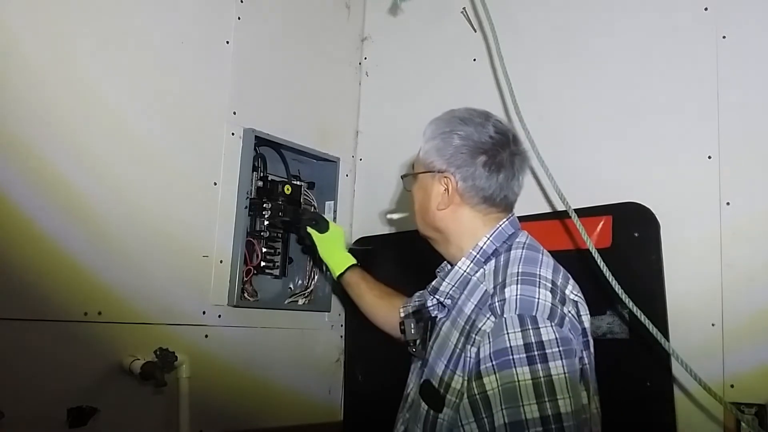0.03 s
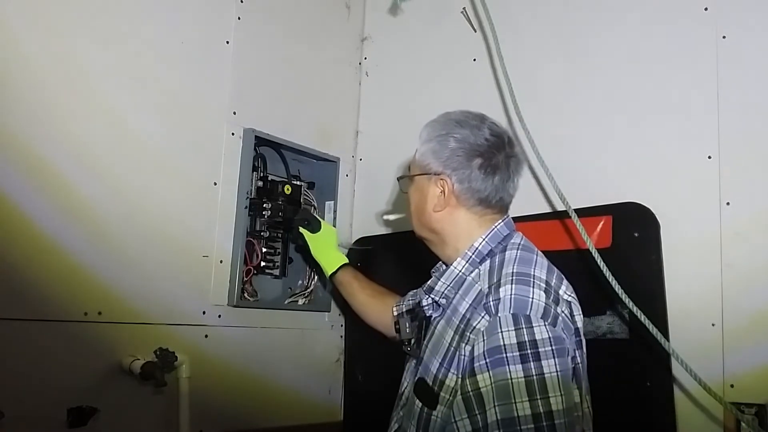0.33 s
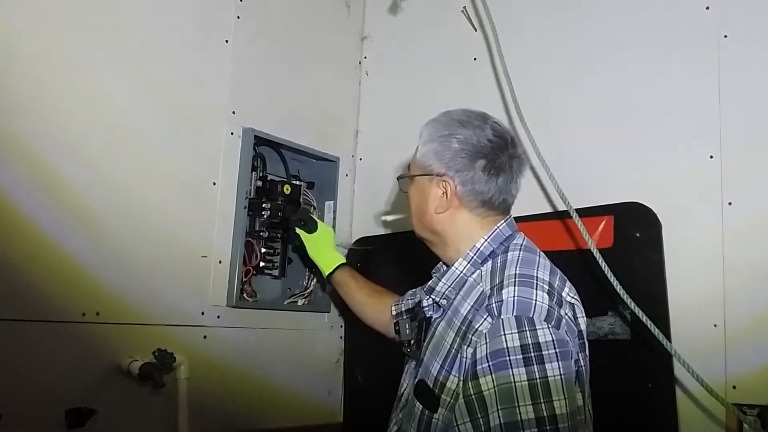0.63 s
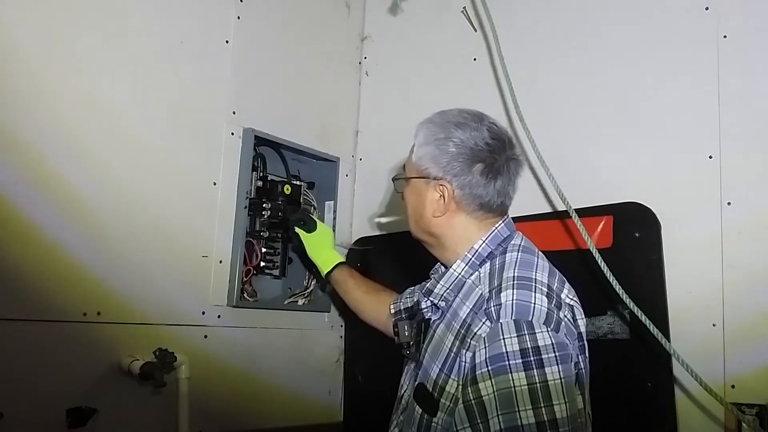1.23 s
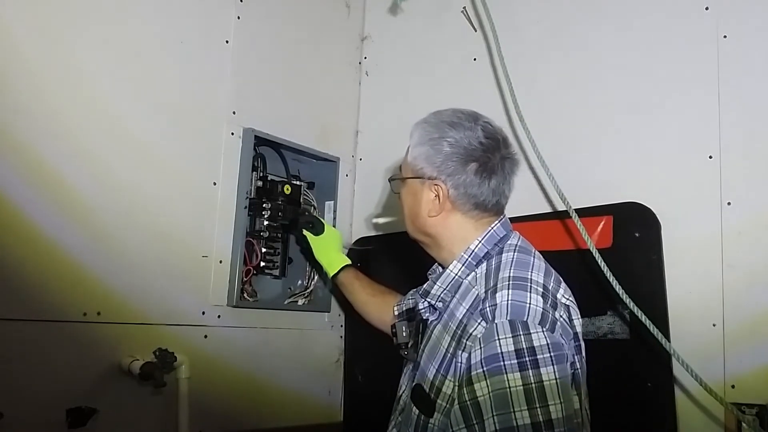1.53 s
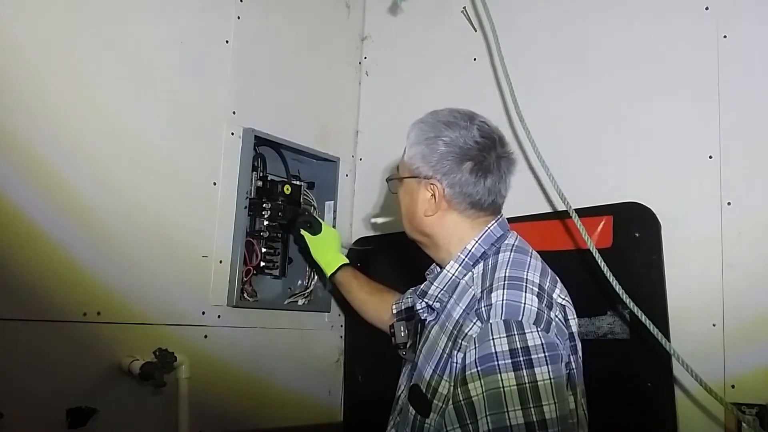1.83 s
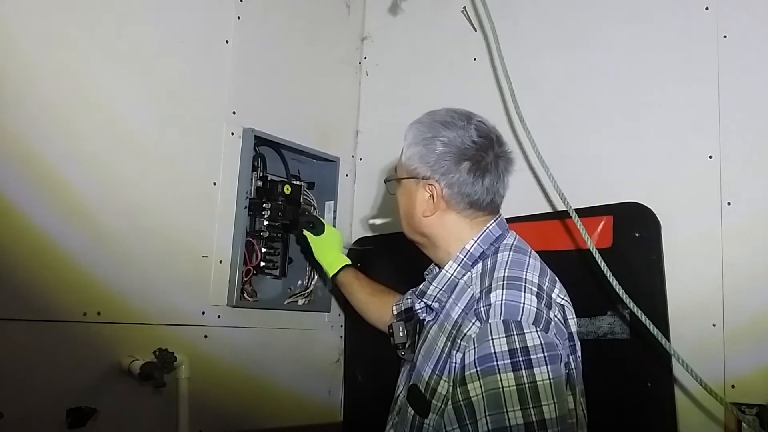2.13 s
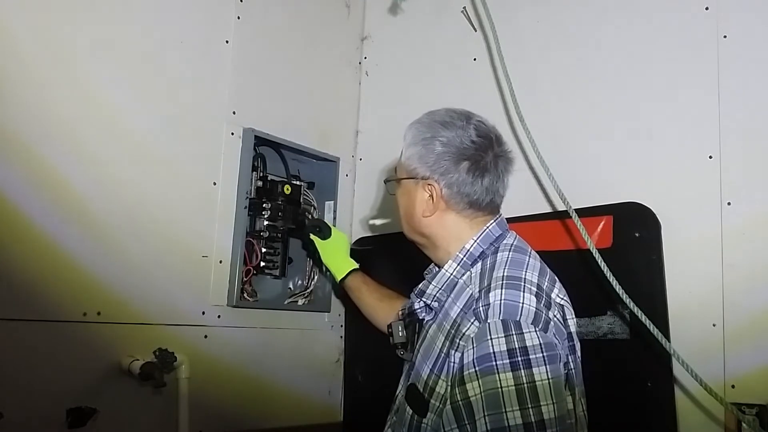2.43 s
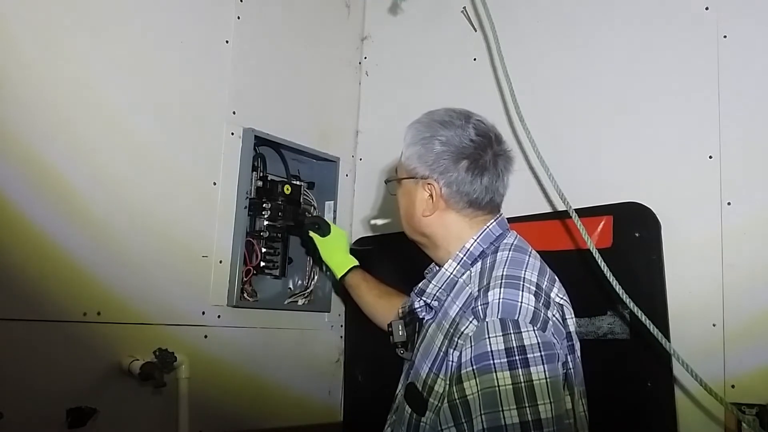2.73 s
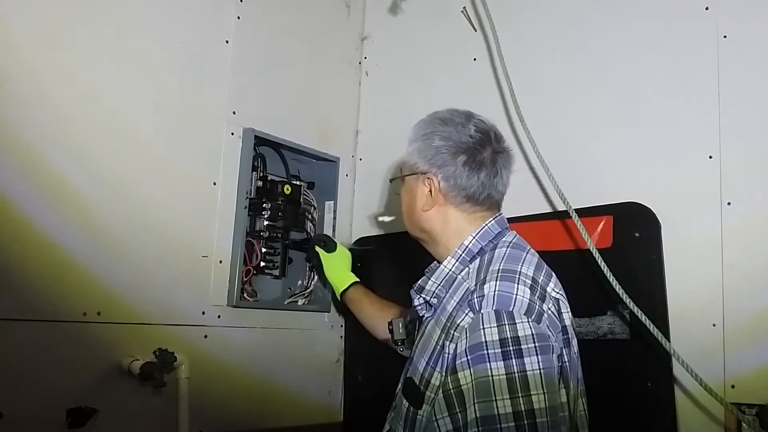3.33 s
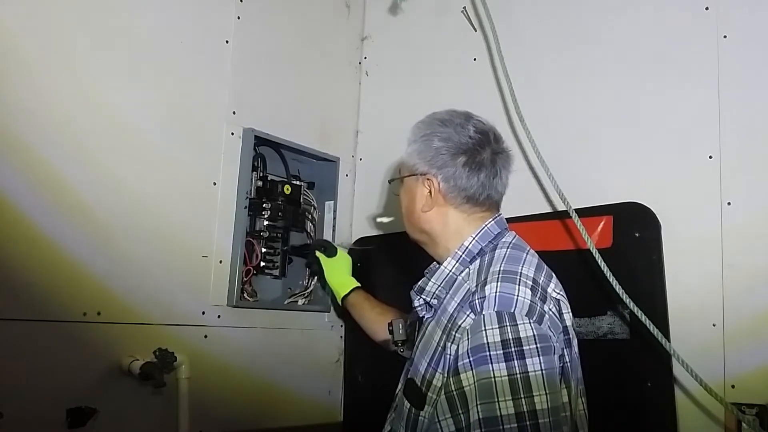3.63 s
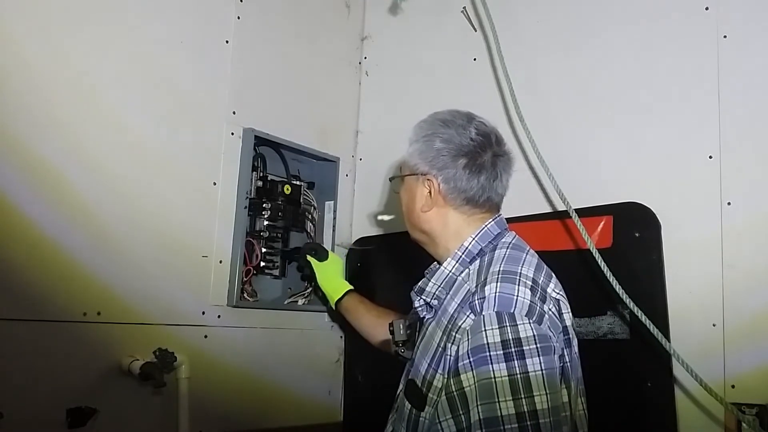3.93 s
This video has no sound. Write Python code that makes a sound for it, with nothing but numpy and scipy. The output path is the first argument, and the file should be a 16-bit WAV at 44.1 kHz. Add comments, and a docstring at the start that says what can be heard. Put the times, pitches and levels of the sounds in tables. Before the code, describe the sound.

A breaker thunks into an electrical panel after two light clicks, over steady hum and hiss.

```python
"""A plastic circuit breaker is pushed into a steel box in a garage wall by a gloved hand.
First comes a light clack, then a soft scrape and a click. Then the breaker snaps into its clip
with a thunk that rattles the box and shakes the wall. A sleeve rustles faintly.
Under it all lie the room's low drone, a wavering hum and the microphone's hiss."""
import sys
import numpy as np
from scipy import signal
from scipy.fft import rfft, irfft, next_fast_len
from scipy.io import wavfile
from scipy.ndimage import map_coordinates

SR = 44100
rng = np.random.default_rng(int(sys.argv[2]) if len(sys.argv) > 2 else 0)


def digitize_waveform(pressure):
    """Quantize a signal to 16-bit integers and store it at the path in sys.argv[1].

    Rows of a 2-D input are taken as channels; values are limited to [-1, 1].
    """
    field = np.atleast_2d(pressure).T
    bounded = np.clip(field, -1, 1)
    quanta = np.round(bounded * 32767).astype(np.int16)
    wavfile.write(sys.argv[1], SR, quanta)


N = 176400
RING = SR * 3 // 4  # samples that each hit gets to die away

# Each time the breaker hits something. Each row: start in seconds, click level in dB, crack level in dB,
# Hz above which the crack is dulled, clip level in dB, knock level in dB, Hz above which the knock is
# dulled, thud level in dB.
HITS = [(1.7131, -39.5, -50.5, 8000, -70, -54, 2000, -66),
        (1.7214, -47.5, -58, 4500, -56, -49.5, 1200, -50), (2.2937, -43, -58, 1800, -75, -45, 1300, -77),
        (2.2975, -48, -64, 1500, -75, -40, 644, -65), (2.5497, -27, -41, 2980, -39, -41.5, 1900, -57),
        (2.552, -33.5, -52, 2500, -26, -36.5, 1500, -43.5), (2.5556, -41, -62, 1500, -45, -23, 1350, -35),
        (2.586, -39, -68, 1500, -46, -43, 700, -51.5), (2.608, -56, -70, 1500, -45, -52, 800, -47)]
# The tones of four struck parts. Each row: pitch in Hz, level in dB, seconds to fade by 60 dB.
CASE_TONES = [(935, 0, 0.019), (1147, -5, 0.028), (1333, 8.5, 0.0083), (1540, -2, 0.03), (1725, -6, 0.021),
              (2175, -20, 0.04), (2890, -22.5, 0.031)]  # the breaker's plastic case
CLIP_TONES = [(926, -34, 1.7), (978, 5, 0.049), (1548, -12.5, 0.19), (1730, -8, 0.041),
              (2497, -10.5, 0.036)]  # the steel clip that grips the power bar
BOX_TONES = [(260, -17.5, 0.19), (342, -21, 0.18), (394, -2, 0.087), (461, -15.5, 0.068), (577, -7, 0.19),
             (625.6, -5.5, 0.18), (718, -37, 0.18), (780, -24, 0.13), (900, -15, 0.12), (1048, -24, 0.32),
             (1092, -18.5, 0.25), (1184, -18, 0.18), (1282, -24, 0.12)]  # the steel box
WALL_TONES = [(56.4, -6, 0.13), (74, -4.5, 0.51), (115.4, -3, 0.15), (148.6, -2, 0.48), (179, -10, 0.13),
              (315, 17.5, 0.014)]  # the hollow wall: a slow sway and one short punch
# The tone colour of three noises. Each row: frequency in Hz, level in dB.
CRACK_COLOUR = [(200, -15), (1000, 2), (1900, 0), (2500, -6), (2950, 1), (3450, -12), (4200, -5),
                (5000, -5), (5600, -18), (8000, -18), (16000, -30)]  # the sharp crack of a hit
CLICK_ECHO_COLOUR = [(100, -24), (600, 5.5), (1000, -2), (1600, 6), (1950, -0.5), (3000, -21),
                     (5000, -19.5), (8000, -28), (16000, -43)]  # the garage's echo of a click
KNOCK_ECHO_COLOUR = [(60, -17), (190, -10), (260, -0.5), (370, 3.5), (480, 1), (620, 6), (740, -4),
                     (860, -1.5), (1020, 0), (1300, -11), (1650, -10), (1950, -17), (3000, -25),
                     (6000, -49), (16000, -60)]  # its echo of a knock
def breaker():
    out, t = np.zeros(N), np.arange(RING) / SR
    crack_fade = amp(-60 * t / 0.079)  # down 60 dB in 79 ms
    for start, click_db, crack_db, crack_hz, clip_db, knock_db, knock_hz, thud_db in HITS:
        crack = amp(crack_db) * soften(noise(CRACK_COLOUR, RING) * crack_fade, crack_hz)
        case = ring(CASE_TONES, attack_s=0.00043) + amp(-13) * echo(CLICK_ECHO_COLOUR)
        click = amp(click_db) * case
        clip = amp(clip_db) * ring(CLIP_TONES, attack_s=0.001)
        box = ring(BOX_TONES, attack_s=0.0019) + amp(-9) * echo(KNOCK_ECHO_COLOUR)
        knock = amp(knock_db) * soften(box, knock_hz)
        thud = amp(thud_db) * ring(WALL_TONES, attack_s=0.0014)
        add(out, start, crack + click + clip + knock + thud)
    return out

# The tones of the breaker's seat. Each row: pitch in Hz, level in dB, seconds to fade by 60 dB.
SEAT_TONES = [(400, 1.5, 0.048), (470, -5, 0.079), (593, -2, 0.081), (746, -7, .03), (1210, -14, 0.022)]
def scrape():
    """The breaker slides along its seat in many tiny slips, and each slip makes the seat ring."""
    middle_s, half_length_s, slips_per_s = 2.232, 0.02, 700
    slips = (rng.random(N) < slips_per_s / SR) * rng.standard_normal(N)
    swell = np.exp(-((np.arange(N) / SR - middle_s) / half_length_s) ** 2 / 2)
    ringing = signal.fftconvolve(slips, ring(SEAT_TONES, attack_s=0.0019))[:N]
    return amp(-48.5) * swell * unit(ringing)

# How long the garage echoes. Each row: frequency in Hz, seconds to fade by 60 dB.
ECHO_FADES = [(100, 0.48), (400, 0.25), (1000, 0.27), (2000, 0.16), (6000, 0.18)]
def echo(colour):
    """Sound bounces around the garage: the echo builds up quickly, and its low notes last longest."""
    delay_s, rise_s = 0.0011, 0.00083
    hz, seconds, bands = signal.stft(noise(colour, RING), SR, nperseg=512)
    fade = amp(-60 * seconds / along(ECHO_FADES, hz)[:, None])
    tail = signal.istft(bands * fade, SR, nperseg=512)[1][:RING]
    since_arrival = np.maximum(np.arange(RING) / SR - delay_s, 0)
    return tail * (1 - np.exp(-since_arrival / rise_s))

# The moves of the arm. Each row: middle in seconds, half the length in seconds, level in dB.
ARM_MOVES = [(0.028, 0.11, -58.5), (2.875, 0.13, -74), (3.72, 0.083, -66), (3.918, 0.084, -57.5)]
# The tone colour of rubbing cloth. Each row: frequency in Hz, level in dB.
CLOTH_COLOUR = [(100, -25), (280, -12), (390, 8.5), (560, -6.5), (900, -2), (1500, -1.5), (2200, -16.5),
                (5000, -20.5), (16000, -43)]
def sleeve():
    """Cloth rubs unevenly, swelling and fading with each move of the arm."""
    t = np.arange(N) / SR
    swells = sum(amp(db) * np.exp(-((t - middle) / half) ** 2) for middle, half, db in ARM_MOVES)
    rubbing = noise(CLOTH_COLOUR, N) * amp(1.2 * wobble(rate=90))  # flickers by about 1 dB
    return swells * unit(rubbing)

# The tone colour of the room's drone and the microphone's hiss. Each row: frequency in Hz, level in dB.
DRONE_COLOUR = [(10, -6.5), (25, -4), (45, -4), (62, 0.5), (80, -8), (102, 0.5), (125, -8.5), (170, -13),
                (400, -16.5), (800, -22), (1500, -27), (2200, -32), (6000, -43.5)]
HISS_COLOUR = [(100, -15), (2000, 1.5), (3500, 1), (5000, 3), (6500, -1.5), (10000, -4), (15500, -4)]
def background():
    """The room drones, a low hum wavers and the microphone hisses evenly."""
    drone_db, hum_hz = -52, 101.9
    drone = amp(drone_db + 0.43 * wobble(rate=7.06)) * noise(DRONE_COLOUR, N)
    drift_radians = 1.43 * wobble(rate=6.1)
    hum = amp(-63.5) * unit(np.sin(2 * np.pi * hum_hz * np.arange(N) / SR + drift_radians))
    hiss = amp(-64.5) * noise(HISS_COLOUR, N)
    return drone + hum + hiss

def ring(tones, attack_s):
    """A struck part rings with fading tones, their levels a little different on each hit."""
    t, out = np.arange(RING) / SR, np.zeros(RING)
    for k, (hz, db, fade_s) in enumerate(tones):
        level = amp(db + rng.normal(0, 1) - 60 * t / fade_s)
        out += (-1) ** k * level * np.sin(2 * np.pi * hz * t)  # neighbours swing opposite ways
    return out * (1 - np.exp(-t / attack_s))

def soften(x, hz):
    """A softer hit sounds duller: turn down everything above hz."""
    return signal.sosfilt(signal.butter(2, hz, fs=SR, output="sos"), x)

def noise(colour, size):
    """Noise with the given tone colour and an average level of 1."""
    hz = np.fft.rfftfreq(size, 1 / SR)
    random_phases = np.exp(2j * np.pi * rng.random(len(hz)))
    return unit(irfft(amp(along(colour, hz)) * random_phases, size))

def wobble(rate):
    """A smooth curve through random points, with rate points a second."""
    points = rng.standard_normal(int(N * rate / SR) + 4)
    return map_coordinates(points, [np.arange(N) * rate / SR])

def along(table, hz):
    """Read between the rows of a table, spacing frequencies by octaves."""
    row_hz, values = np.transpose(table)
    return np.interp(np.log(hz + 1), np.log(row_hz + 1), values)

def amp(db):
    """Turn decibels into a number to multiply by."""
    return 10 ** (np.asarray(db) / 20)

def unit(x):
    """Scale a sound to an average (rms) level of 1."""
    return x / np.sqrt(np.mean(x ** 2) + 1e-20)

def add(track, start_s, x):
    """Mix the sound x into the track from start_s on."""
    part = track[round(start_s * SR):][:len(x)]
    part += x[:len(part)]

def scene():
    """Everything as heard by one microphone across the garage."""
    return (breaker() + scrape() + sleeve() + background())[None]

def record(dry):
    """Cut off the very highest treble and shift the whole wave up by a small, silent amount."""
    top_hz, offset = 15800, 0.0169
    size = next_fast_len(N + SR // 2)
    kept = np.fft.rfftfreq(size, 1 / SR) < top_hz
    return irfft(rfft(dry, size) * kept, size)[:, :N] + offset

dry = scene()
out = record(dry)
digitize_waveform(out)
```